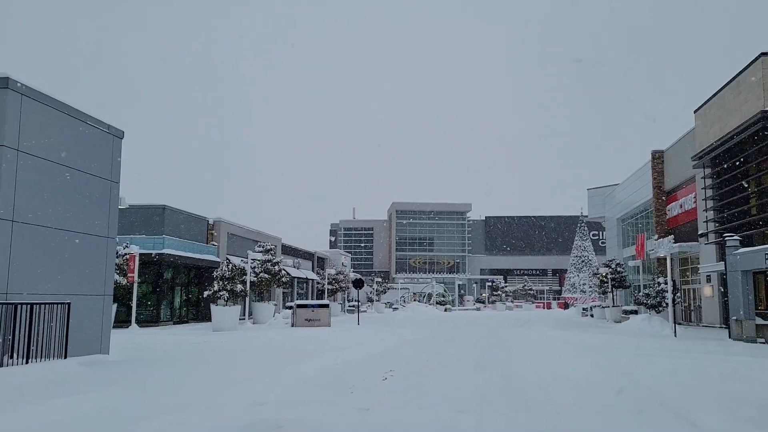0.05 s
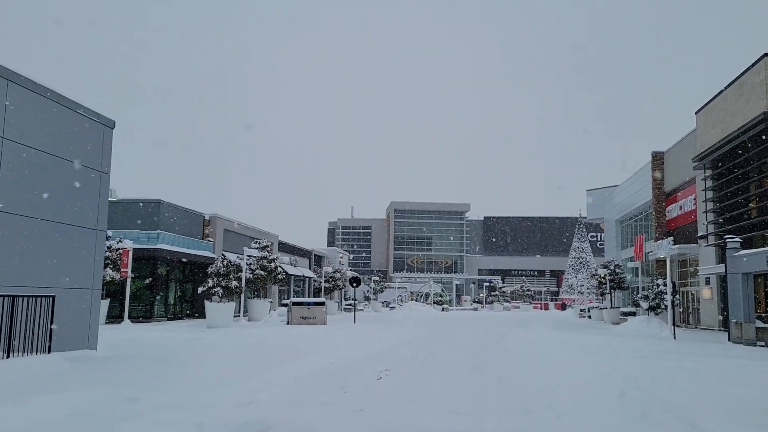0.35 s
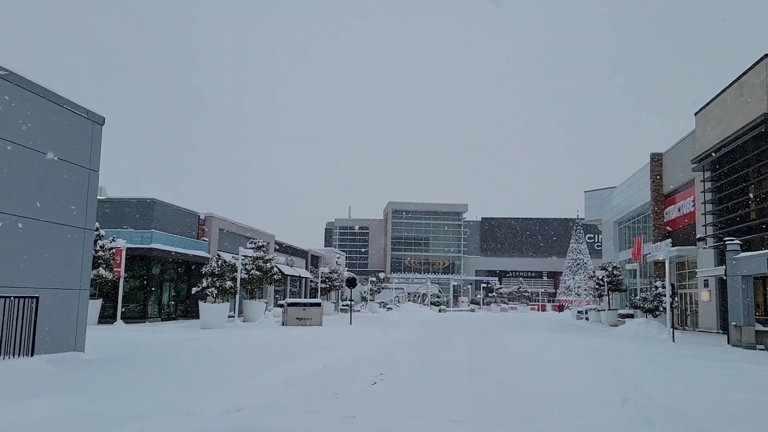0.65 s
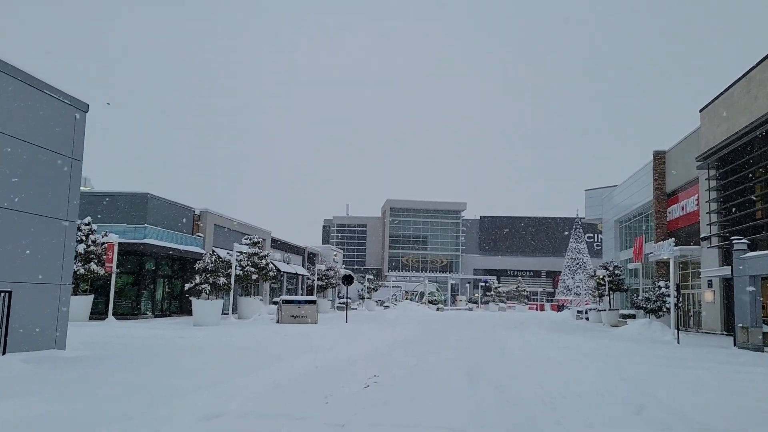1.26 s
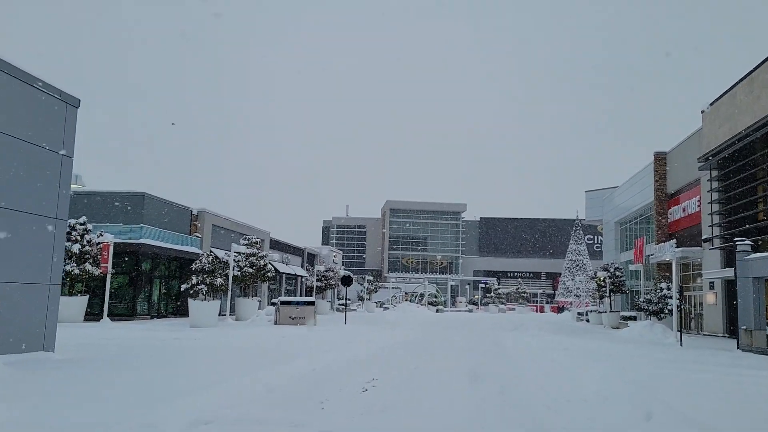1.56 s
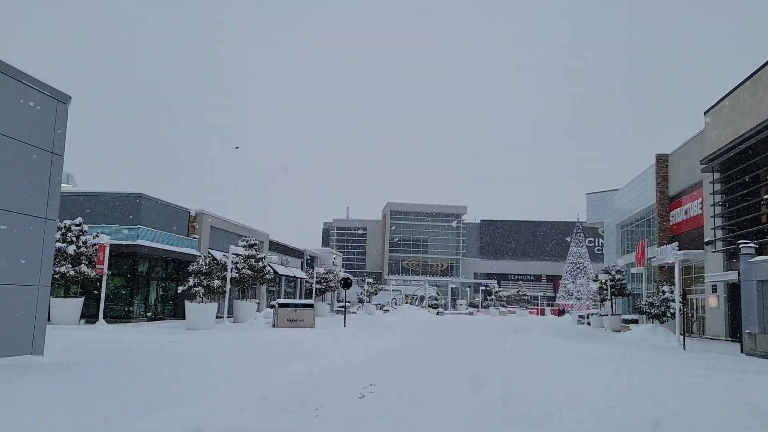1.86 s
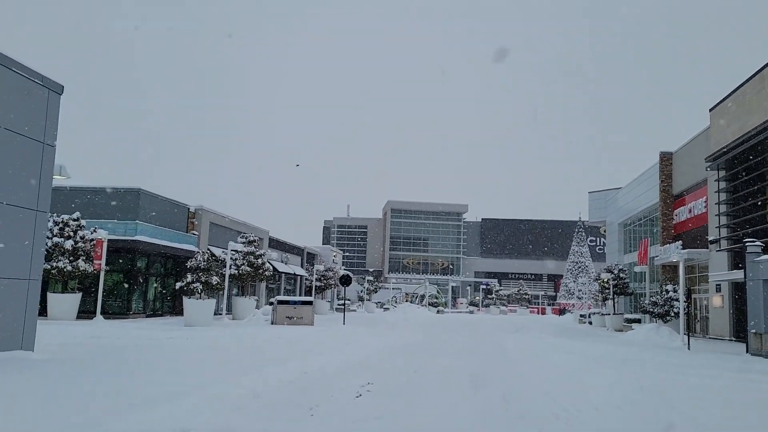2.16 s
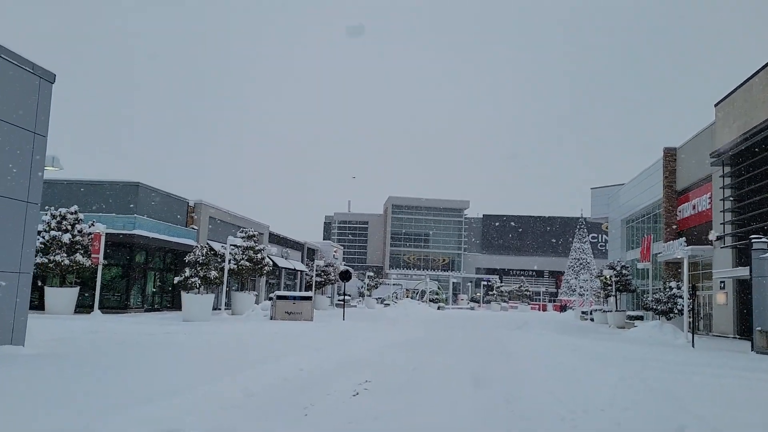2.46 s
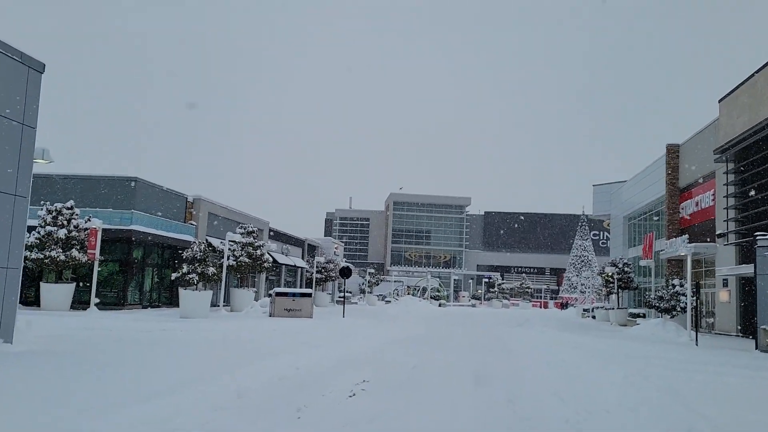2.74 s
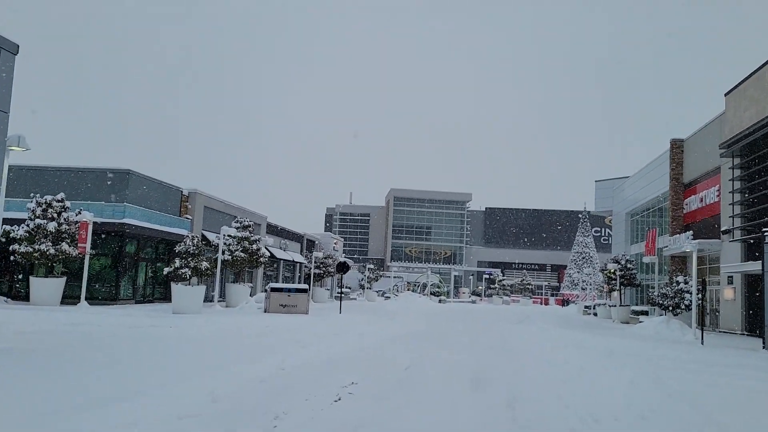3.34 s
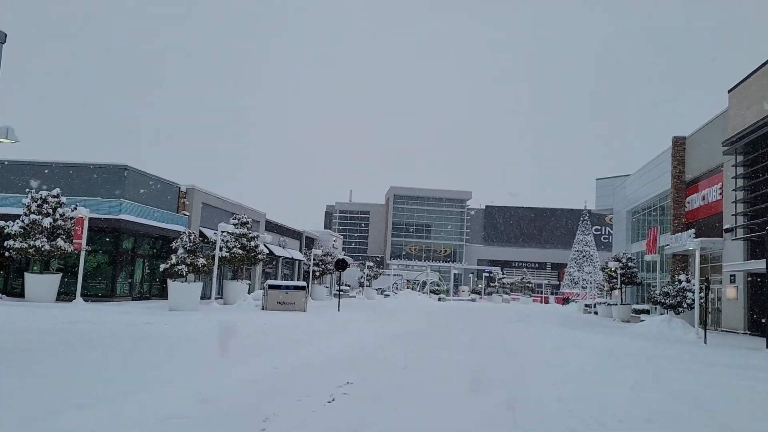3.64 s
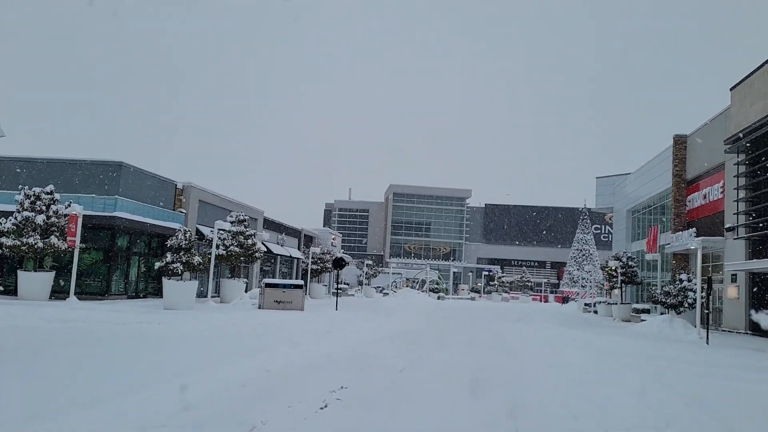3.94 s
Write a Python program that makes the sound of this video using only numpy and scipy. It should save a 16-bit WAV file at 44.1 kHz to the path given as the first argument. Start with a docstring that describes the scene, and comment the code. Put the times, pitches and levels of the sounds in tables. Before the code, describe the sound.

Someone walks steadily in soft snow as wind buffets the microphone and icy flakes tick.

```python
"""Wind rumbles on two microphone ports over the far murmur of a town. Falling snow ticks and prickles
on the ports above a fine hiss, and one big flake bursts. Someone walks across an empty square in
soft snow: lumps pop under the boots, and each step swishes the powder aside and packs it with a
soft crunch of many tiny slips."""
import sys
import numpy as np
from scipy.fft import rfft, irfft, next_fast_len
from scipy.io import wavfile
from scipy.ndimage import uniform_filter1d, map_coordinates

SR = 44100
rng = np.random.default_rng(int(sys.argv[2]) if len(sys.argv) > 2 else 0)


def generate_wav(sig):
    """Save sig (samples, or channels by samples) to the path in sys.argv[1] as 16-bit PCM at SR."""
    pcm = np.round(np.clip(np.atleast_2d(sig).T, -1, 1) * 32767).astype(np.int16)
    wavfile.write(sys.argv[1], SR, pcm)


N = 176400
TIME = np.arange(N) / SR


def amp(db):
    """Decibels to gain."""
    return 10 ** (np.asarray(db) / 20)


def unit(x):
    """Scale to rms 1."""
    return x / np.sqrt(np.mean(x ** 2) + 1e-20)


def along(points, hz):
    """Read a curve of (Hz, value) points on a log frequency axis."""
    freqs, values = np.transpose(points)
    return np.interp(np.log(hz + 1), np.log(freqs + 1), values)


def automation(points):
    """Join (seconds, value) points into one value per sample."""
    return np.interp(TIME, *np.transpose(points))


def wobble(rate):
    """A smooth random curve, rate knots a second."""
    return map_coordinates(rng.standard_normal(N // 20), [TIME * rate + 2])


def filtered(x, response):
    """Equalise x with a gain that is a function of frequency."""
    size = next_fast_len(N + SR // 2)
    return irfft(rfft(x, size) * response(np.fft.rfftfreq(size, 1 / SR)), size)[..., :N]


def noise(colour, likeness):
    """Stereo noise of rms 1 from (Hz, dB) colour points and (Hz, left-right correlation) points."""
    def mid_side_gains(hz):
        angle = np.arccos(np.clip(along(likeness, hz), -1, 1)) / 2
        return amp(along(colour, hz)) * [np.cos(angle), np.sin(angle)]
    mid, side = filtered(rng.standard_normal((2, N)), mid_side_gains)
    return unit(np.array([mid + side, mid - side]))


def panned(db):
    """Stereo gains for a pan given as dB of left over right."""
    return amp(np.array([[.5], [-.5]]) * db)


def fade(t, attack, t60):
    """A quick rise, then a decay of 60 dB in t60 seconds."""
    t = np.maximum(t, 0)
    return (1 - np.exp(-t / attack)) * np.exp(-np.log(1000) * t / t60)


def swell(t, rise, fall):
    """A bell around t = 0 with its own rise and fall."""
    return np.exp(-.5 * (t / np.where(t < 0, rise, fall)) ** 2)


def add(out, start, sound):
    """Mix a short sound in at start seconds."""
    i = int(np.clip(round(start * SR), 0, N - 1))
    out[:, i:i + sound.shape[-1]] += sound[..., :N - i]


# The gusts that drive rumble and flutter. Each row: time in seconds, strength in dB.
GUSTS = [(0, -34.5), (.25, -41), (.6, -41), (.72, -37.5), (.92, -28.5), (1.02, -30.5), (1.2, -25),
         (1.4, -30), (1.6, -29), (1.75, -26.5), (1.95, -27), (2.12, -29.5), (2.25, -36), (2.5, -37),
         (2.72, -37), (2.9, -33.5), (3.06, -36.5), (3.18, -26.5), (3.33, -37.5), (3.56, -35.5),
         (3.7, -32.5), (4, -35)]
# Single eddies hitting the ports. Each row: peak time in seconds, rumble level in dB,
# flutter level in dB, half length in seconds, pan in dB.
EDDIES = [(0.446, -36.5, -47, 0.018, -4), (1.13, -21.5, -31.5, 0.0066, -15), (1.212, -46, -30, 0.02, 7),
          (1.483, -27.5, -37.5, 0.009, 0.5), (1.734, -22.5, -34.5, 0.018, 3),
          (1.93, -25.5, -30, 0.017, -0.5), (2.054, -30, -39, 0.019, 9), (2.337, -31.5, -38.5, 0.016, 3),
          (2.825, -28.5, -41.5, 0.021, 6.5), (2.986, -32.5, -43, 0.026, 3), (3.238, -26, -39, 0.033, 7),
          (3.431, -30, -41.5, 0.029, 11), (3.627, -34, -61, 0.019, -12.5), (3.741, -24.5, -34.5, 0.017, 2),
          (3.841, -29, -45, 0.0093, -7)]
# The tone of the wind's two layers. Each row: frequency in Hz, relative level in dB.
RUMBLE_COLOUR = [(10, -8), (25, -9.5), (40, -6.5), (60, -1.5), (80, -1.5), (105, -8.5), (140, -19),
                 (220, -46), (500, -90)]
FLUTTER_COLOUR = [(50, -24), (100, 1), (140, -0.5), (200, -6), (300, -15.5), (500, -31.5), (1000, -70),
                  (3000, -116)]

def wind(rumble_trim_db=-2.5, flutter_trim_db=-11.5, strong_db=-25, flutter_growth=1.42, low_cut_hz=27):
    """Wind buffets each port separately; strong eddies add a flutter above the rumble."""
    strength_db = automation(GUSTS)
    rumble_power = amp(strength_db + rumble_trim_db) ** 2
    flutter_power = amp(strong_db + flutter_trim_db + flutter_growth * (strength_db - strong_db)) ** 2
    for at, rumble_db, flutter_db, half_length, pan_db in EDDIES:
        eddy = swell(TIME - at, half_length, half_length) * panned(pan_db)
        rumble_power = rumble_power + (amp(rumble_db) * eddy) ** 2
        flutter_power = flutter_power + (amp(flutter_db) * eddy) ** 2
    rumble = noise(RUMBLE_COLOUR, [(60, 0.05)])
    rumble /= np.abs(uniform_filter1d(rumble ** 2, SR // 30, axis=1)) ** 0.37  # tame chance swells
    rumble = unit(rumble * amp(1.3 * np.array([wobble(18), wobble(14)])))
    flutter = noise(FLUTTER_COLOUR, [(150, 0)])
    flutter = unit(flutter * amp(3.0 * np.array([wobble(60), wobble(60)])))
    buffet = np.sqrt(rumble_power) * rumble + np.sqrt(flutter_power) * flutter
    return filtered(buffet, lambda hz: hz / np.hypot(hz, low_cut_hz))


# The murmur's tone. Each row: frequency in Hz, relative level in dB.
TOWN_COLOUR = [(150, -31), (250, 1), (367, 2), (444, -1), (576, -1.5), (651, -2.5), (802, -6),
               (1100, -11.5), (1330, -7.5), (1450, -10), (2670, -17), (3170, -18), (5830, -31),
               (6820, -30.5), (8700, -45.5), (13200, -37.5), (16000, -43)]
# Its stereo width. Each row: frequency in Hz, side over mid in dB.
TOWN_WIDTH = [(150, -1), (280, -2), (480, 7), (950, 7), (1400, 3.5), (2000, -1), (4000, 0), (8000, 2.5)]
# Its lean to one side. Each row: frequency in Hz, pan in dB.
TOWN_PAN = [(200, 1.5), (2000, .5), (5000, -0.5), (8000, 12.5), (14000, -28)]
# Its slow drift. Each row: time in seconds, level in dB.
TOWN_LEVEL = [(0, -50.5), (.3, -51.5), (.6, -52), (1.5, -52), (2.5, -51.5), (3.45, -53.5), (4, -52.5)]
# Thin, distant whines. Each row: peak time in seconds, half length in seconds, pitch in Hz, level in dB.
WHINES = [(.08, 0.41, 1270, -71), (3.85, 0.066, 1335, -61.5), (3.92, 0.062, 2660, -69.5)]

def town(waver_db=1.0, air_loss_hz=9500, whine_width_hz=40):
    """The wide, far murmur of the town, dulled by the air, with a thin whine now and then."""
    def mid_side_gains(hz):
        mid_db = along(TOWN_COLOUR, hz)
        return amp([mid_db, mid_db + along(TOWN_WIDTH, hz)])
    mid, side = filtered(rng.standard_normal((2, N)), mid_side_gains)
    murmur = filtered(np.array([mid + side, mid - side]),
                      lambda hz: panned(along(TOWN_PAN, hz)) / np.hypot(1, (hz / air_loss_hz) ** 2))
    out = amp(automation(TOWN_LEVEL) - waver_db * wobble(4.6)) * unit(murmur)
    for at, half_length, pitch, db in WHINES:
        white = rng.standard_normal((2, N))
        whine = unit(filtered(white, lambda hz: 1 / (1 + ((hz - pitch) / whine_width_hz) ** 2)))
        out += amp(db) * swell(TIME - at, half_length, half_length) * whine
    return out


# The ebb and flow of the hiss; the prickle rides it too. Each row: time in seconds, level in dB.
HISS_LEVEL = [(0, -76), (.3, -65.5), (.6, -72.5), (.95, -66), (1.2, -69), (1.4, -63.5), (1.65, -72),
              (2.05, -65.5), (2.45, -70.5), (2.65, -65.5), (2.95, -68.5), (3.2, -66.5), (3.43, -73.5),
              (3.6, -63.5), (3.76, -69), (3.86, -76), (4, -70.5)]
# The tone of the hiss. Each row: frequency in Hz, relative level in dB.
HISS_COLOUR = [(1000, -38), (3000, -4), (5000, -1.5), (7000, -0.5), (8500, -7.5), (11000, -18.5),
               (16000, -23)]

def hiss(rough_db=2.5, flicker_db=2.5, pan_db=1.5):
    """A fine, grainy treble hiss that comes and goes."""
    level_db = automation(HISS_LEVEL) + rough_db * wobble(500) + flicker_db * wobble(45)
    return amp(level_db) * panned(pan_db) * noise(HISS_COLOUR, [(5000, 0.036)])


# The crisp tone of tiny crystals. Each row: frequency in Hz, relative level in dB.
PRICKLE_COLOUR = [(1500, -18), (4000, -4), (7500, 2), (9500, 1), (11000, -10), (13000, -5), (16000, -4)]

def crystal_prickle(count=300, per_second=60, scatter_db=4.5, pan_spread_db=7, over_hiss_db=4.5):
    """The smallest ice crystals prick the ports, louder where the hiss is."""
    pricks = np.zeros((2, N))
    prick = fade(TIME[:SR // 100], attack=0.00022, t60=0.005)
    starts = np.cumsum(rng.exponential(1, count)) / per_second
    for start, (size, side) in zip(starts, rng.standard_normal((count, 2))):
        add(pricks, start, amp(scatter_db * min(size, 2)) * prick * panned(pan_spread_db * side))
    return amp(automation(HISS_LEVEL) + over_hiss_db) * pricks * noise(PRICKLE_COLOUR, [(5000, 0)])


# The flakes that stand out. Each row: start in seconds, level in dB before the trim,
# ring pitch in Hz, leftward lean in steps of lean_db.
CLEAR_FLAKES = [(0.192, -49.5, 6820, 10), (0.258, -43, 7420, 3.5), (0.386, -36.5, 4100, 6),
                (0.4818, -40, 4400, 5), (0.534, -42, 5030, -2), (0.801, -53, 6950, 1.0),
                (1.0567, -39.5, 3850, -5.5), (1.1184, -37, 3590, -4), (1.1732, -47, 3780, 7),
                (1.2022, -50, 4000, 3), (1.269, -45, 4120, 4), (1.3059, -40, 6270, 0),
                (1.4037, -38.5, 3880, 1.0), (1.4341, -42.5, 3690, 3.5), (1.512, -32.5, 4400, 2.5),
                (1.5672, -40, 6970, 2.5), (1.7004, -33, 7250, -2), (1.736, -42.5, 6130, -8.5),
                (1.7703, -40, 6310, 0), (1.8234, -37.5, 3530, 3.5), (2.0222, -35, 3760, -1),
                (2.149, -45, 5980, 1), (2.1884, -43, 7040, 5), (2.261, -37, 6550, 3.0),
                (2.2862, -39, 6510, 0), (2.3213, -39, 7000, 2.0), (2.368, -40, 3870, 1),
                (2.586, -38, 5950, -2), (2.7052, -38, 7200, -2.5), (2.7796, -38, 5980, -1),
                (2.8799, -40, 4380, 0.5), (2.919, -41.5, 3500, 4.5), (2.9557, -40.5, 6310, 3.5),
                (3.0235, -38, 3500, 1), (3.3105, -41.5, 3580, -3), (3.9549, -63, 5390, 13)]
# The tone of shattering ice. Each row: frequency in Hz, relative level in dB.
ICE_COLOUR = [(300, -41), (1500, -7), (3000, 1), (5000, 0), (7000, 3.5), (9000, -3.5), (11000, -9.5),
              (15000, -7.5)]

def flake_ticks(trim_db=-2.5, lean_db=2.2, ring_db=4.5, ring_log_width=0.35,
                fine_count=500, fine_per_second=55, fine_db=-53, fine_hz=6660):
    """Icy flakes shatter on the ports, a few clear among many fine, each favouring its own band."""
    out, t = np.zeros((2, N)), TIME[:1024]
    freqs = np.fft.rfftfreq(len(t), 1 / SR)
    burst = fade(t, attack=0.00087, t60=0.0093)
    starts = np.cumsum(rng.exponential(1, fine_count)) / fine_per_second
    fine = [(start, fine_db + 3.2 * size, fine_hz * np.exp(0.45 * pitch), 5 * side)
            for start, (size, pitch, side) in zip(starts, rng.standard_normal((fine_count, 3)))]
    clear = [(start, db + trim_db, hz, lean_db * lean) for start, db, hz, lean in CLEAR_FLAKES]
    for start, db, hz, pan_db in clear + fine:
        ring = swell(np.log((freqs + 1) / hz), ring_log_width, ring_log_width)
        colour = amp(along(ICE_COLOUR, freqs) + ring_db * ring)
        crack = unit(irfft(rfft(rng.standard_normal((2, len(t)))) * colour))
        if start < N / SR:
            add(out, start, amp(db) * burst * crack * panned(pan_db))
    return out


# Lumps of snow breaking. Each row: time in seconds, click pitch in Hz, click gain in dB,
# thud gain in dB, pan in dB.
LUMPS = [(.2537, 1810, -30, -32, -3), (0.6844, 1310, -31, -28.5, 0.5), (0.7864, 1080, -29, -33, 2.5),
         (.8881, 790, -27, -31, -2.5), (0.9106, 1300, -32, -54, 3), (0.9277, 1300, -25.5, -62, 0),
         (0.9903, 1260, -38, -61, 0), (1.3593, 970, -26, -28, 0), (1.845, 1790, -33, -62, 3),
         (2.367, 1700, -32, -37, 0), (2.378, 1200, -34.5, -50, -4), (2.532, 1000, -39.5, -38.5, 4),
         (2.5859, 1100, -32.5, -56, 1), (2.599, 1200, -38, -63, 5), (2.614, 800, -40, -34.5, 0),
         (2.9585, 1800, -26.5, -41, 5), (3.0219, 2510, -33, -38.5, 4), (3.0219, 2530, -36, -58, 6),
         (3.148, 860, -35.5, -35.5, 3), (3.5561, 1300, -25.5, -26.5, 0.5), (3.717, 910, -36, -42, 0)]

def lump_pops(thud_hz=372, thud_delay_s=0.00079, grit_db=-6.5, snap_db=-14, snap_s=0.00017):
    """A lump gives way under a boot: a snap, a click of a cycle or two, a hollow thud and some grit."""
    out, t = np.zeros((2, N)), np.arange(-SR // 200, SR // 20) / SR
    thud_t = t - thud_delay_s
    thud = 2 * np.sin(2 * np.pi * thud_hz * thud_t) * fade(thud_t, attack=0.00033, t60=0.01)
    grit_colour = [(200, 15), (1000, 10), (2500, -12), (4500, -21.5), (8000, -25), (16000, -40)]
    snap_colour = [(500, -3.5), (1800, -8.5), (3000, 4.5), (4500, -15.5), (8000, -19.5), (16000, -52)]
    grit_noise = noise(grit_colour, [(1000, 0.1)])
    snap_noise = noise(snap_colour, [(1000, 0.47)])
    for at, hz, click_db, thud_db, pan_db in LUMPS:
        samples = np.round((at + t) * SR).astype(int)
        cycles = hz * t - 1 / 4
        click = -np.sin(2 * np.pi * cycles) * swell(cycles, rise=0.58, fall=0.22)
        grit = amp(grit_db) * fade(t, attack=0.00027, t60=0.022) * grit_noise[:, samples]
        snap = amp(snap_db) * swell(t, snap_s, snap_s) * snap_noise[:, samples]
        pop = amp(click_db) * (click + grit + snap) + amp(thud_db) * thud
        add(out, at + t[0], pop * panned(pan_db))
    return out


# The footsteps, for both swish and crunch. Each row: moment of full weight in seconds,
# swish level in dB, crunch level in dB, crunch pitch in Hz.
STEPS = [(0.369, -54.5, -64, 1420), (.92, -59.5, -49.5, 1360), (1.488, -53.5, -46.5, 1150),
         (2.075, -57.5, -50, 1140), (2.593, -57, -51, 1120), (3.15, -55.5, -52, 930),
         (3.70, -54.5, -53, 1180)]
# The soft tone of loose powder. Each row: frequency in Hz, relative level in dB.
POWDER_COLOUR = [(200, 2), (600, 13.5), (1600, 4.5), (3000, 0.5), (5000, -6.5), (7000, -11), (10000, -31.5),
                 (16000, -19)]

def powder_swishes(lead_s=0.014, rough_db=4.0):
    """Each boot pushes loose powder aside, loudest just before the full weight lands."""
    level = sum(amp(db) * swell(TIME - at + lead_s, rise=0.039, fall=0.069) for at, db, _, _ in STEPS)
    roughness = amp(rough_db * wobble(260))
    return level * roughness * noise(POWDER_COLOUR, [(1000, 0.23), (3000, 1.0), (8000, 0.076)])


def packing_crunches(slips=160, per_second=380, half_length_s=0.024, ring_cycles=8,
                     pitch_spread=0.3, scatter_db=3.5, pan_spread_db=4):
    """Under the weight the snow packs in many tiny slips, each a short ring."""
    out, t = np.zeros((2, N)), TIME[:SR // 60]
    for at, _, db, centre_hz in STEPS:
        offsets = (np.arange(slips) - slips / 2 + rng.uniform(-0.93, 1, slips)) / per_second
        crunch = np.zeros((2, N))
        for offset, (pitch, size, side) in zip(offsets, rng.standard_normal((slips, 3))):
            hz = centre_hz * np.exp(pitch_spread * pitch)
            ring = np.sin(2 * np.pi * hz * t) * fade(t, attack=0.00026, t60=ring_cycles / hz)
            gain = amp(scatter_db * size) * swell(offset, half_length_s, half_length_s)
            add(crunch, at + offset, gain * ring * panned(pan_spread_db * side))
        out += amp(db) * unit(crunch) * np.sqrt(2 * half_length_s * SR / N)  # level over its own length
    return out


# The tone of a big flake bursting. Each row: frequency in Hz, relative level in dB.
SPLAT_COLOUR = [(200, -5), (900, 8.5), (1800, -6.5), (3500, -1), (6000, 1.5), (9000, -4), (12000, -17),
                (16000, -14)]

def flake_splat(at_s=1.1198, level_db=-39.5, crumbs_db=-16, pan_db=-10):
    """A big flake bursts on the right port and its crumbs scatter."""
    burst = swell(TIME - at_s, rise=0.0013, fall=0.0012)
    crumbs = amp(crumbs_db) * swell(TIME - at_s, rise=0.0013, fall=0.010)
    return amp(level_db) * (burst + crumbs) * panned(pan_db) * noise(SPLAT_COLOUR, [(1000, 0)])


def scene():
    """Wind, steps, falling snow and town in the open air."""
    buffet = wind()
    footsteps = powder_swishes() + packing_crunches() + lump_pops()
    snowfall = flake_ticks() + flake_splat() + crystal_prickle()
    return buffet + footsteps + snowfall + hiss() + town()


def record(dry):
    """A brick-wall low-pass takes off the very top of the treble."""
    return filtered(dry, lambda hz: hz < 15900)


dry = scene()
out = record(dry)
generate_wav(out)
```